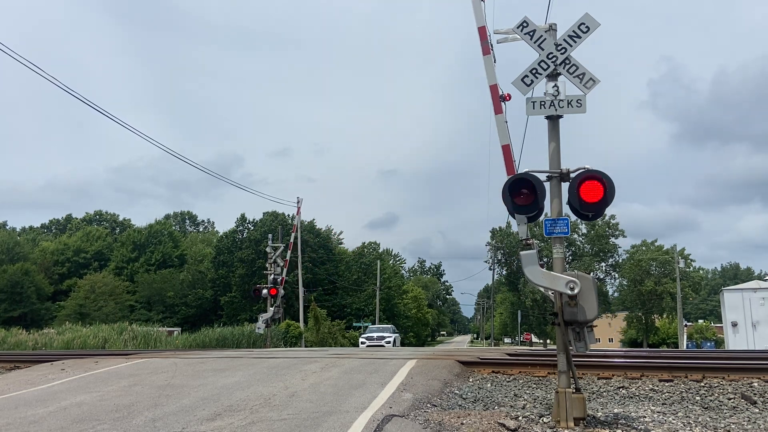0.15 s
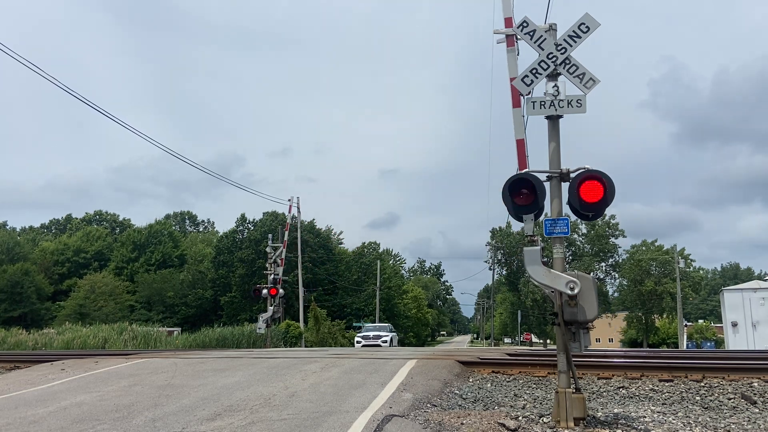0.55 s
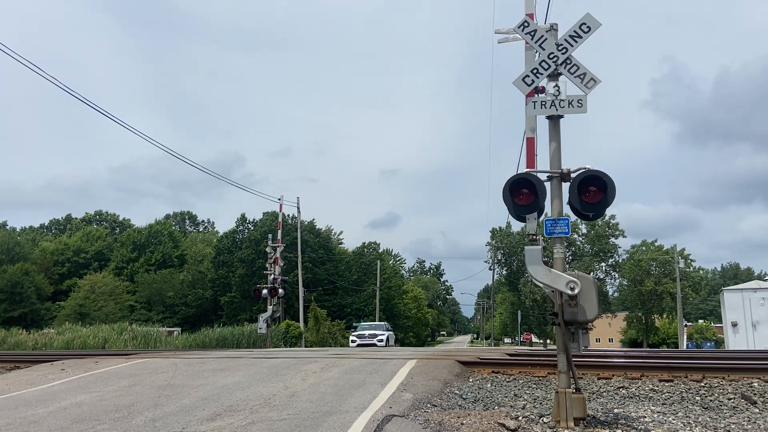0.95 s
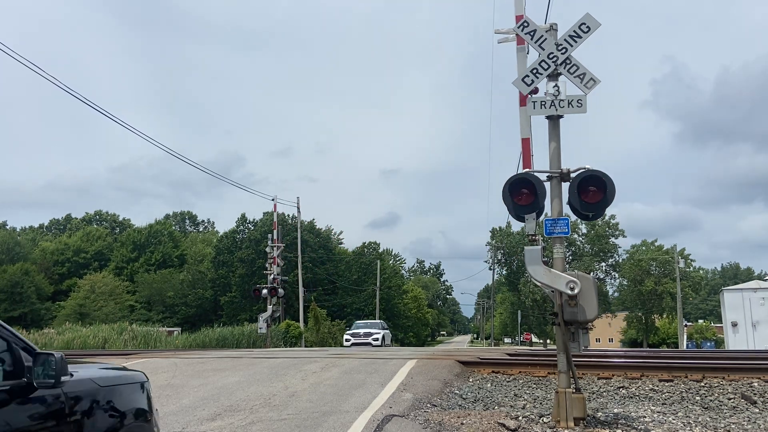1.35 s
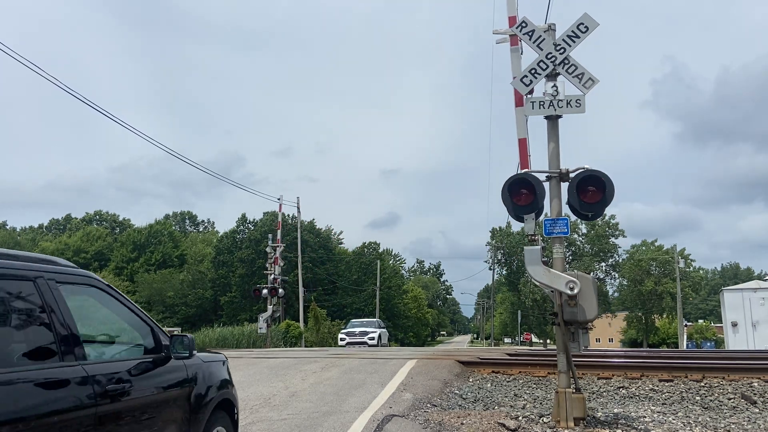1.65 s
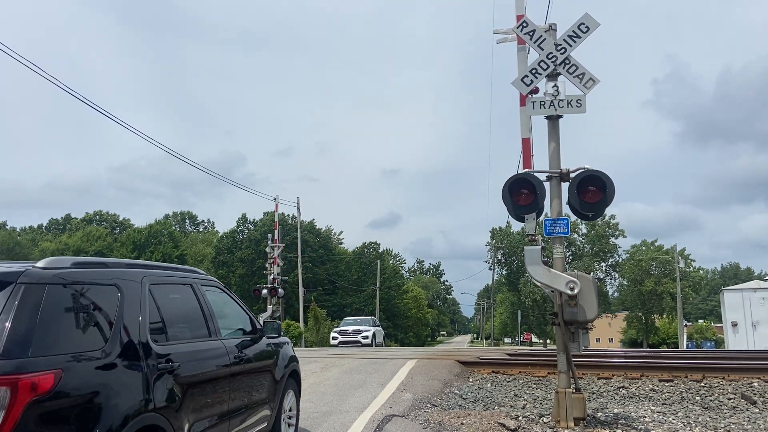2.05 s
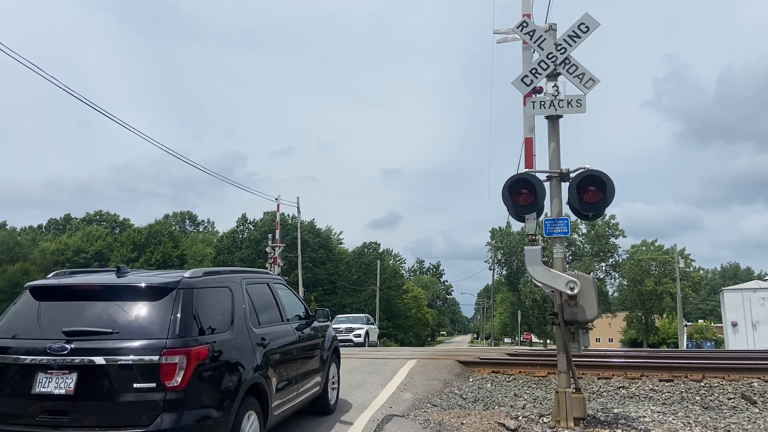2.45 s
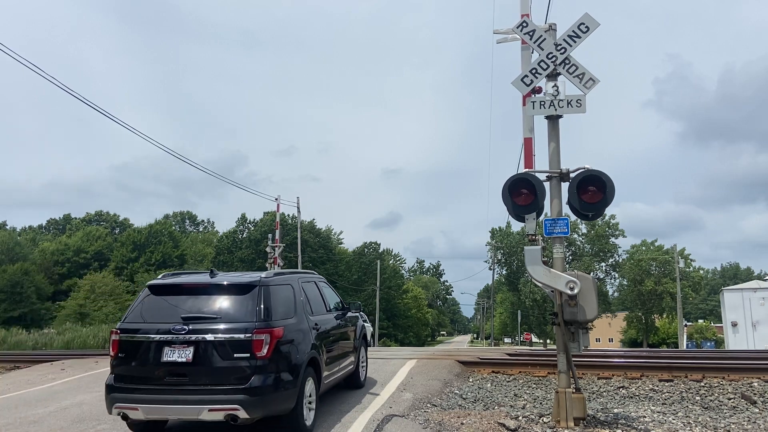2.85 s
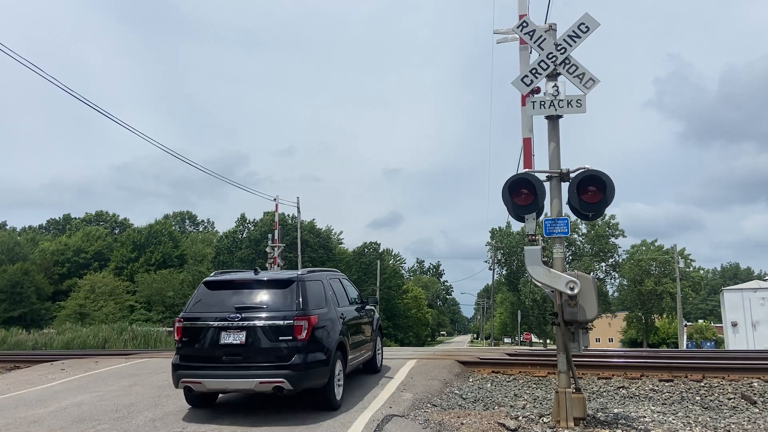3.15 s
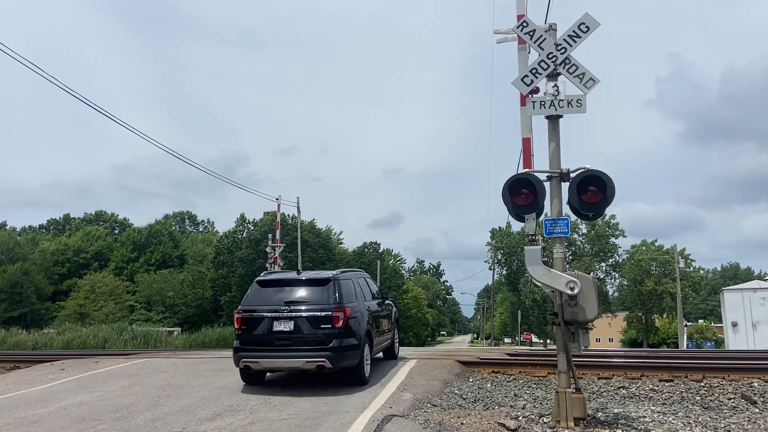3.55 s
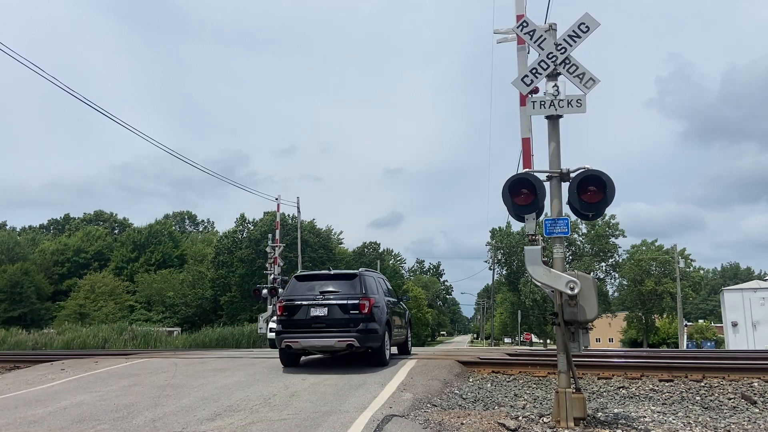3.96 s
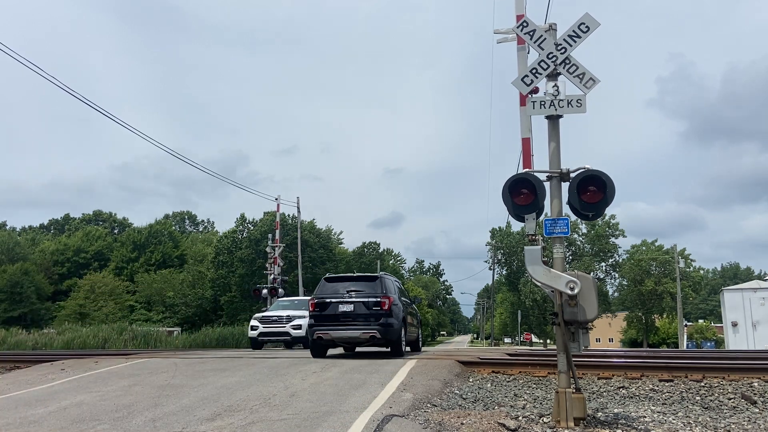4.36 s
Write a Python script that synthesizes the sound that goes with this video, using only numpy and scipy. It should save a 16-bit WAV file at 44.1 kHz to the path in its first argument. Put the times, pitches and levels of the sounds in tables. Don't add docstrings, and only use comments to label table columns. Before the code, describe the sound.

Outdoors at a level crossing, heard on a stereo phone near the road. Broad tyre roar and airy fan hiss run throughout, nearest and leaning left around 0.5 to 1.1 seconds. At first a gate motor hums with a rough throb until about 0.6, its gear teeth ringing the housing; a very faint, thin brake whistle sounds near 0.16. Loose linkage chatters and knocks, and the arm seats with a solid double clunk at 1.06. A low exhaust drone swells from 0.9, growing fuller and buzzier around 1.9 as the car pulls away toward the front. Dry knocks come near 1.5, then a cluster of panel rattles and suspension knocks at 1.95 to 2.2, with a faint wavering gear whine. The drone thins. From 3.7 to 4.4, deep wheel thumps, hard rail knocks and tiny dry chirps sound while a second engine, lumpy earlier, rises to a firm low note.

```python
import sys
import numpy as np
from scipy import signal
from scipy.fft import rfft, irfft
from scipy.io import wavfile
from scipy.ndimage import uniform_filter1d, map_coordinates

SR = 44100
rng = np.random.default_rng(int(sys.argv[2]) if len(sys.argv) > 2 else 0)


def to_wav(sig):
    pcm = np.clip(np.atleast_2d(sig), -1, 1) * 32767
    pcm = np.round(pcm).astype(np.int16)
    wavfile.write(sys.argv[1], SR, pcm.T)


def ratio_of_db(decibels):
    return 10 ** (np.asarray(decibels, float) / 20)


N = 198120
T = np.arange(N) / SR
F = np.fft.rfftfreq(N, 1 / SR)

# time in seconds, nearness of the car in dB, nearness of the follower in dB.
NEARNESS = [(0, 2.5, 3.5), (.12, 4.5, 0.5), (.45, 7, 0.5), (.8, 7.5, 0), (1.1, 7, 2), (1.55, 2.5, 2),
            (2.1, 0.5, 1), (2.6, 0, -0.5), (3, -2.5, 0.5), (3.5, -2, 0), (3.9, -6.5, 4), (4.3, -5.5, 5.5),
            (4.49, -6, 8)]


def curves(rows):
    s, *columns = np.transpose(rows)
    return [np.interp(T, s, column) for column in columns]


def between(t0, t1, fade=0.08):
    return np.clip(np.minimum(T - t0, t1 - T) / fade + 0.5, 0, 1) ** 2


def held(db, t0, t1, sag_db, fade=0.055):
    return ratio_of_db(db - sag_db * (T - t0)) * between(t0, t1, fade)


def walk(rate):
    k = int(SR / rate)
    steps = np.repeat(rng.standard_normal(N // k + 1), k)
    return 1.27 * uniform_filter1d(uniform_filter1d(steps, k), k)[:N]


def tone(hz, wobble_db=-3.0, rate=12):
    turns = np.cumsum(hz) / SR + rng.random()
    return np.sqrt(2) * ratio_of_db(wobble_db * walk(rate)) * np.sin(2 * np.pi * turns)


def band(hz, octaves):
    bell = np.exp(-(np.log2((F + 1) / hz) / octaves) ** 2)
    x = irfft(rfft(rng.standard_normal(N)) * bell, N)
    return x / x.std()


def delayed(x, delay_ms):
    return map_coordinates(x, [np.arange(N) - delay_ms * SR / 1000], order=3, mode="nearest")


def ports(x, lead_ms, pan_db):
    return np.array([x * ratio_of_db(pan_db / 2), delayed(x, lead_ms) * ratio_of_db(-pan_db / 2)])


def add(out, s, burst):
    i = int(s * SR)
    out[i:i + len(burst)] += burst[:N - i]


def rings(events, cycles, rise=0.23):
    out, t = np.zeros(N), T[:SR // 4]
    for s, db, hz in events:
        envelope = np.minimum(t * hz / rise, 1) * np.exp(-t * hz / cycles)
        add(out, s, ratio_of_db(db) * np.sin(2 * np.pi * hz * t) * envelope)
    return out


def knocks(events, high_hz, ring_s, blow_s, rise_s):
    out, t = np.zeros(N), T[:SR // 4]
    thud_band = signal.butter(3, [380, 950], "bandpass", fs=SR, output="sos")
    crack_band = signal.butter(2, [1200, 4200], "bandpass", fs=SR, output="sos")
    pole = np.exp(-np.log(1000) / (max(ring_s, 0.01) * SR))
    for s, db, low_hz, crack_db in events:
        blow = rng.standard_normal((2, len(t))) * np.minimum(t / rise_s, 1) * np.exp(-t / blow_s)
        panel = np.sin(2 * np.pi * low_hz * t) * (1 - np.exp(-t / (2 * rise_s))) * pole ** (t * SR)
        modes = []
        for hz in (high_hz, 0.864 * high_hz, 1.6 * high_hz):
            modes.append(signal.lfilter([1], [1, -2 * pole * np.cos(2 * np.pi * hz / SR), pole ** 2], blow[0]))
        thud, crack = signal.sosfilt(thud_band, blow[0]), signal.sosfilt(crack_band, blow[1])
        shares = [0.72, 0.3, 0.2, 0.08, 0.42, ratio_of_db(crack_db)]
        parts = zip(shares, [panel, *modes, thud, crack])
        add(out, s - 0.002, ratio_of_db(db) * sum(share * part / np.abs(part).max() for share, part in parts))
    return out


def off_ground(x):
    # time in seconds, delay of the echo in ms, strength of the echo from 0 to 1.
    asphalt_echo = [(0, 0.54, .05), (.75, 0.49, 0.22), (1.05, 0.48, 0.12), (1.6, 0.43, 0.05), (2.2, .45, 0),
                    (3.2, 0.41, 0.02), (3.5, 0.29, 0.07), (3.8, 0.26, 0.26), (4.49, 0.27, 0.1)]
    delay_ms, share = curves(asphalt_echo)
    return (x + share * delayed(x, delay_ms)) / np.sqrt(1 + share ** 2)


def road(low_ms, hiss_ms, pan_db):
    # pitch in Hz, level in dB per Hz, share arriving from all around from 0 to 1.
    colour = [(28, -20, 0.1), (45, -5, 0.17), (88, -1, 0), (228, -11, 0.11), (510, -11, 0.61),
              (750, -17, 0.36), (1164, -17.5, 0.44), (2280, -26.5, 0.42), (3480, -30, 0.29),
              (5630, -34, 0.48), (9160, -33, 0.02), (11200, -38.5, 0.09), (12100, -54.5, 0.7),
              (16400, -59, 0.2)]
    # pitch in Hz, share of car dB, share of follower dB.
    following = [(220, 0.2552, 1.49), (910, 0.5, 0.81), (2260, 0.49, .5), (3700, .5, 1.08), (5100, 1, 0.5),
                 (7500, -0.14, 0.5), (10570, 1.1, 0.5), (13000, 0.6, -.2)]
    hz_at, db_at, share_at = np.transpose(colour)
    follows_hz, *follows = np.transpose(following)
    car_db, follower_db = curves(NEARNESS)
    parts, around, swell = np.zeros((3, N)), 0, walk(12.0)
    for hz in 32 * 2 ** np.arange(0, 28 / 3, 1 / 3):
        car, behind = (np.interp(np.log(hz), np.log(follows_hz), column) for column in follows)
        move_db = (car * car_db + behind * follower_db) * min(hz / 200, 1)
        flicker_db = 0.21 * min(1500 / hz, 1) * swell + 1.12 * walk(14)
        gain = ratio_of_db(np.interp(np.log(hz), np.log(hz_at), db_at) + move_db + flicker_db) * np.sqrt(hz)
        share = np.clip(np.interp(np.log(hz), np.log(hz_at), share_at), 0, 1)
        around = around + gain * np.sqrt(share) * np.array([band(hz, 1.0), band(hz, 0.64)])
        parts[int(hz > 1900) + int(hz > 3300)] += gain * np.sqrt(1 - share) * band(hz, 0.29)
    roar = ports(parts[0], low_ms, 0.2 * pan_db)
    hiss = ports(off_ground(parts[1]), hiss_ms, pan_db)
    high_hiss = ports(off_ground(parts[2]), 0.009, 1.55 * pan_db)
    total = roar + hiss + high_hiss + around
    return total * ratio_of_db(-33.5) / total.std()


def exhaust():
    # time in seconds, firings per second in Hz.
    firing = [(0, 47.6), (.9, 49.73), (1.37, 51.2), (1.65, 52.77), (1.93, 52.84), (2.8, 54.57),
              (3.25, 56.57), (3.7, 56.13), (4.49, 53.8)]
    # time in seconds, level in dB.
    boom = [(0, -48), (.6, -47), (.9, -35.5), (1.25, -32.5), (1.75, -32.5), (2.3, -37.5), (3.7, -37.5),
            (3.85, -37), (4.49, -41)]
    # multiple of the firing rate, starting level in dB, start and end in seconds, sag in dB per second.
    tailpipes = [
        (3, -42, 1.69, 1.95, -14),
        (3, -32.4, 1.93, 3.2, 3),
        (3, -36.8, 3.17, 3.64, -3),
        (3, -37.5, 3.68, 4.12, 0),
        (8, -45, 1.72, 1.95, -26),
        (8, -37, 1.93, 3.66, 4.8),
        (9, -45, 1.75, 2.85, 3.5),
    ]
    unsteady = [(4, -45, 1.65, 2.95, 3), (6, -52, 1.75, 2.1, 0), (7, -48.5, 2.9, 3.55, 3),
                (14, -50, 1.7, 2.3, 0), (10, -48, 2.1, 2.8, 2), (7, -49, 2.3, 2.62, 0),
                (5, -47, 1.6, 2.1, 0)]
    hz = curves(firing)[0] * (1 + 0.002074 * walk(4.765))
    lope = 1 + 0.21 * ratio_of_db(2 * walk(5.1)) * np.cos(np.pi * np.cumsum(hz) / SR)
    drone = ratio_of_db(curves(boom)[0]) * tone(hz, wobble_db=1.5, rate=8.8)
    for k, *shape in tailpipes:
        note = held(*shape, fade=0.07) * tone(k * hz, wobble_db=-0.06, rate=23)
        drone = drone + note * (lope if k > 3 else 1)
    for k, *shape in unsteady:
        drone = drone + held(*shape) * tone(k * hz, wobble_db=3.0)
    return drone


def follower():
    # time in seconds, level in dB.
    loudness = [(0, -46), (.25, -37), (1.3, -38.5), (2, -39), (2.6, -45), (3.68, -44), (3.73, -35.5),
                (3.95, -29.5), (4.05, -31.5), (4.24, -29), (4.49, -30)]
    # time in seconds, pitch in Hz, rough share from 0 to 1.
    engine_note = [(0, 100, .35), (.9, 104, .35), (1.2, 107, .35), (1.6, 99, .35), (2.1, 99, .4),
                   (2.4, 105, .5), (3.6, 101, .6), (3.85, 103, .12), (4.49, 105.5, .1)]
    hz, rough = curves(engine_note)
    lumps = band(110.6, 1 / 5)
    note = tone(hz * (1 + 0.0278 * rough * walk(14)), wobble_db=1.5 * rough, rate=71)
    octave = tone(2.08 * hz * (1 + 0.03 * walk(25)), wobble_db=2.5, rate=30)
    note = note + ratio_of_db(-17) * between(4.33, 5, fade=0.15) * octave
    level_db = curves(loudness)[0] + 0.5 * rough * walk(17.9)
    return ratio_of_db(level_db) * (np.sqrt(1 - rough / 2) * note + np.sqrt(rough / 2) * lumps)


def gate_motor():
    # pitch in Hz, starting level in dB, start and end in seconds, sag in dB per second.
    hums = [
        (140.5, -52.5, -0.092, 1, -1),
        (277, -36, -.1, 0.097, -20),
        (284, -44, 0.13, 0.57, 0),
        (440, -41, 0.074, 0.64, 6),
        (568.5, -46.5, -0.08, 0.45, -10),
    ]
    # start in seconds, peak level in dB, pitch in Hz.
    teeth = [(0.149, -26, 277), (0.165, -41, 284), (0.207, -24.5, 291), (0.277, -27, 300),
             (0.300, -26, 332), (0.313, -31, 320), (0.331, -36, 310), (0.372, -27, 275), (0.43, -25, 286),
             (0.466, -33, 284), (0.507, -27.5, 282), (0.556, -24.5, 377), (0.603, -29, 292)]
    throb_db = 2.0 * np.sin(2 * np.pi * np.cumsum(15 + 3 * walk(6.6)) / SR)
    hum = 0
    for hz, *shape in hums:
        unsteady_hz = hz * (1 + 0.012 * walk(49.6))
        hum = hum + held(*shape, fade=0.062) * tone(unsteady_hz, wobble_db=1.0, rate=34.6)
    return ratio_of_db(throb_db) * hum + rings(teeth, cycles=5.4, rise=1.9)


def squeal():
    from_peak_s = T - 0.158
    hz = 5925 + 1500 * from_peak_s
    db = -49.5 - 6 * (from_peak_s / 0.042) ** 2
    return ratio_of_db(np.maximum(db, -200)) * (tone(hz, wobble_db=2, rate=50) + ratio_of_db(-15) * tone(2 * hz))


def rattles():
    # start in seconds, peak level in dB, pitch in Hz.
    chatter = [(0.139, -27, 540), (0.196, -28, 500), (0.209, -29, 540), (0.243, -26.5, 520),
               (0.29, -28, 563), (0.314, -24, 343), (0.326, -30, 545), (0.357, -32, 475), (0.366, -30, 545),
               (0.454, -26, 460), (0.543, -32, 386), (0.557, -27, 696), (0.589, -29, 581), (0.72, -33, 535),
               (0.732, -29, 820), (0.774, -25, 426), (0.797, -25, 610), (0.802, -30, 1030),
               (0.863, -28, 624), (0.892, -30, 818), (0.945, -37, 410), (0.975, -31, 431),
               (1.111, -29, 452), (1.459, -30, 452), (1.493, -33, 689), (1.507, -33, 431),
               (1.528, -29, 538), (1.554, -31, 560), (1.609, -30, 452), (1.678, -31, 474),
               (1.715, -26.5, 517), (2.027, -30, 1020), (2.012, -27, 560), (2.033, -30, 600),
               (2.04, -24, 744), (2.078, -36, 970), (1.94, -36, 1100), (2.122, -36, 1930),
               (2.13, -39, 1600), (2.185, -34, 485), (2.05, -31, 780), (2.091, -30, 500), (2.125, -30, 732),
               (2.11, -36, 1750), (2.142, -36, 1700), (4.03, -35, 1596), (4.216, -27, 675)]
    return rings(chatter, cycles=3.7, rise=1.35)


def arm_knocks():
    # start in seconds, peak level in dB, ring in Hz, crack in dB.
    arm_blows = [(0.264, -33, 550, -37), (0.319, -33, 577, -20), (0.528, -30, 430, -6),
                 (0.555, -30, 397, -22), (0.609, -28.5, 483, -20), (0.719, -30.5, 850, -15),
                 (0.734, -35, 870, -5), (0.749, -33.5, 855, -8), (0.791, -28.5, 615, -26),
                 (0.813, -25, 600, -20), (0.84, -28, 585, -13), (0.869, -31, 517, -20),
                 (0.884, -32, 606, -3), (0.896, -26, 605, -11), (0.931, -29, 460, -6),
                 (0.974, -29, 458, -13), (1.109, -37, 645, -2), (1.229, -34, 522, 0),
                 (1.271, -43, 465, -18), (1.332, -28, 510, -7)]
    return knocks(arm_blows, high_hz=625, ring_s=0.065, blow_s=0.007, rise_s=0.003)


def brackets():
    # start in seconds, peak level in dB, pitch in Hz.
    pings = [(0.556, -26, 668), (0.582, -30, 670), (0.612, -33, 670), (0.718, -38, 2060), (0.72, -37, 1720),
             (0.735, -37, 2030), (0.82, -37, 2270), (0.845, -36, 960), (0.888, -35, 1580),
             (0.893, -34.5, 2900), (0.891, -34, 3970), (1.0, -47, 5300), (1.076, -40, 2230),
             (0.745, -38, 1710), (0.891, -35, 1920), (1.066, -36.5, 2220), (1.063, -31, 1374),
             (1.066, -36, 1830), (1.073, -41, 880), (1.59, -36, 1470), (4.053, -35, 930), (4.138, -33, 940),
             (4.1335, -37, 3700), (4.134, -41, 2100), (4.4, -38, 1325)]
    return rings(pings, cycles=12.0, rise=1.2)


def solid_stops():
    # start in seconds, peak level in dB, pitch in Hz.
    stops = [
        (1.0553, -18, 650),
        (1.0622, -16, 640),
        (1.9605, -26, 880),
        (1.9695, -24.5, 820),
        (1.9945, -21, 490),
        (2.0275, -26, 800),
        (2.086, -25, 700),
        (2.1455, -25, 500),
    ]
    return rings(stops, cycles=2.4, rise=1.5)


def plate_knocks():
    # start in seconds, peak level in dB, ring in Hz, crack in dB.
    plate_blows = [(1.058, -36, 620, -3), (1.066, -26, 545, -7), (1.074, -27, 500, -16),
                   (1.489, -32, 780, -16), (1.498, -29, 704, -5), (1.622, -33, 510, -18),
                   (1.714, -44, 500, -5), (1.657, -31, 560, -9), (1.944, -48, 510, -2),
                   (1.961, -30, 857, -20), (1.979, -36, 764, -21), (1.998, -34, 480, -18),
                   (2.027, -33, 600, -25), (2.07, -32, 695, -25), (2.061, -25, 750, -24),
                   (2.089, -29, 465, -7), (2.117, -28, 510, -8), (2.144, -34, 500, -34),
                   (2.162, -39, 637, -26), (2.446, -40, 554, -31), (2.468, -32, 495, -21),
                   (3.724, -39, 1662, 6.5), (4.029, -34, 470, -10), (4.056, -37, 650, -30),
                   (4.135, -38, 530, 5), (4.141, -40, 646, -19), (4.214, -39, 700, -13),
                   (4.256, -46, 530, -12), (4.275, -44, 498, -4), (4.353, -35, 750, -27),
                   (4.406, -30, 694, -14)]
    return knocks(plate_blows, high_hz=817, ring_s=0.029, blow_s=0.0087, rise_s=0.00096)


def rail_strikes():
    # start in seconds, peak level in dB, pitch in Hz.
    strikes = [(1.0715, -24, 500), (1.4868, -22, 760), (4.0315, -22, 320), (4.0537, -18, 700),
               (4.1386, -21, 850), (4.1425, -24, 640), (4.277, -25, 390), (4.4013, -20, 640)]
    return rings(strikes, cycles=1.6, rise=0.5)


def whine():
    # time in seconds, pitch in Hz, level in dB.
    gear_whine = [(1.68, 1040, -70), (1.77, 1040, -52), (1.92, 1030, -60), (2.0, 1015, -50),
                  (2.15, 1040, -52), (2.28, 1030, -51), (2.4, 1014, -49), (2.83, 1026, -52),
                  (2.9, 1026, -66), (3.4, 1140, -66), (3.5, 1150, -55), (3.66, 1160, -53), (3.7, 1160, -75)]
    hz, db = curves(gear_whine)
    return ratio_of_db(db + 1.8 * walk(45)) * tone(hz + 7 * walk(30), wobble_db=0.7)


def shudder():
    gain = ratio_of_db(-49 + 2.4 * walk(90)) * between(1.95, 2.19, fade=0.035)
    return gain * (band(710, 0.19) + ratio_of_db(-3.0) * band(1750, 0.32))


def wheel_thumps():
    # start in seconds, peak level in dB, pitch in Hz.
    drops = [(3.689, -19, 164), (3.825, -19, 101), (4.031, -22, 111), (4.125, -21, 65), (4.349, -18, 106),
             (4.409, -15, 72.7)]
    return rings(drops, cycles=0.94)


def joint_chirps():
    # start in seconds, peak level in dB, pitch in Hz.
    chirps = [(3.7075, -36, 7200), (3.7115, -30, 7500), (3.7148, -31, 7040), (3.72, -33, 6800),
              (3.7225, -36, 6350), (3.72, -37, 1680), (4.134, -33, 6300)]
    return rings(chirps, cycles=10.1)


def scene():
    # time in seconds, lead of the low parts in ms, lead of the fan and tyre hiss in ms, left minus right
    # in dB.
    left_lead = [(0, 0.29, 0.32, 5.5), (.8, 0.32, 0.39, 5), (1.3, 0.2, 0.12, 7.5), (2, 0.083, 0.042, 6.5),
                 (3.5, 0.0084, 0.017, -0.5), (4, 0.22, 0.05, -0.5), (4.49, 0.35, 0.062, 0.5)]
    low_ms, hiss_ms, pan_db = curves(left_lead)
    traffic = exhaust() + follower() + whine() + wheel_thumps()
    ahead = gate_motor() + rattles() + arm_knocks() + brackets() + solid_stops()
    ahead = ahead + plate_knocks() + rail_strikes() + shudder() + joint_chirps()
    mix = road(low_ms, hiss_ms, pan_db) + ports(traffic, low_ms, 0.17)
    return mix + ports(ahead, 0.0034, 0.37) + ports(squeal(), hiss_ms, 1)


def band_limit(x):
    return signal.sosfilt(signal.butter(12, 15600, fs=SR, output="sos"), x)


def record(dry):
    split_hz, top_hz, low_cut_hz = 5860, 15400, 34
    lag_ms, in_step_hz = 0.236, 6930
    hiss_db = -69.5 + 0.91 * curves(NEARNESS)[0] + 0.8 * walk(11)
    top_hiss = ratio_of_db(hiss_db) * band(hz=14000, octaves=0.036)
    spectrum = rfft(dry + top_hiss)
    spectrum = spectrum / (1 + (F / top_hz) ** 60) / np.sqrt(1 + (low_cut_hz / (F + 1)) ** 4)
    treble = 1 / (1 + (split_hz / (F + 1)) ** 24)
    turn = np.pi * (F - in_step_hz) * lag_ms / 1000
    one_capsule = 0.8 * spectrum[0] * np.exp(1j * np.outer([-1, 1], turn))
    return band_limit(irfft((1 - treble) * spectrum + treble * one_capsule, N))


dry = scene()
out = record(dry)
to_wav(out)
```